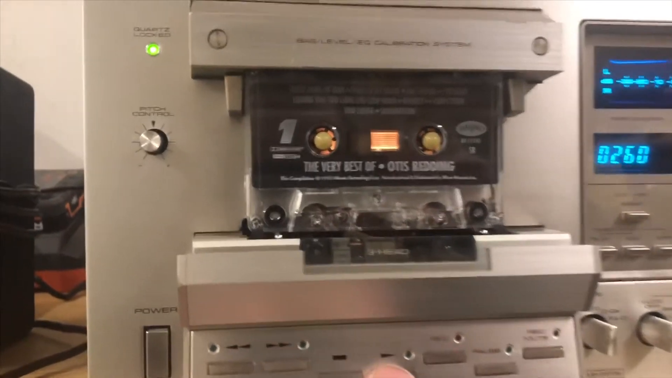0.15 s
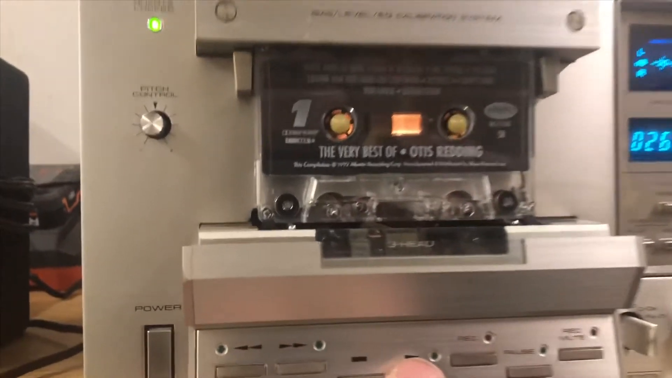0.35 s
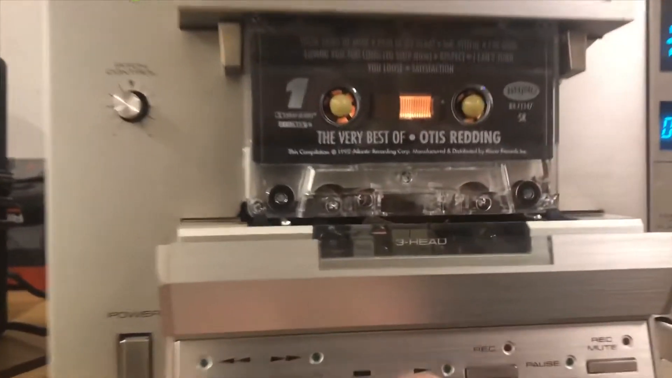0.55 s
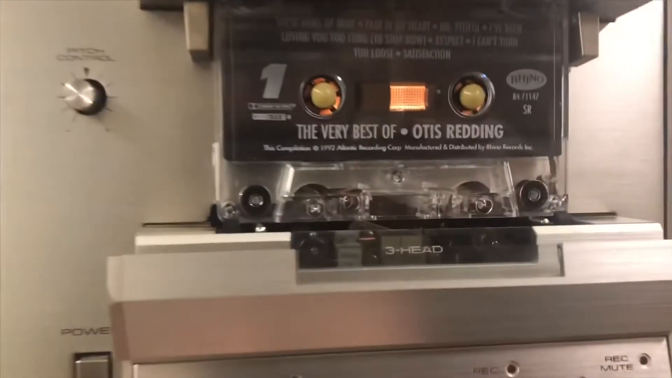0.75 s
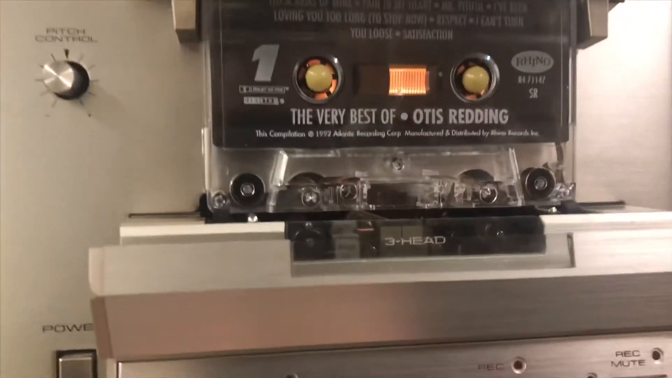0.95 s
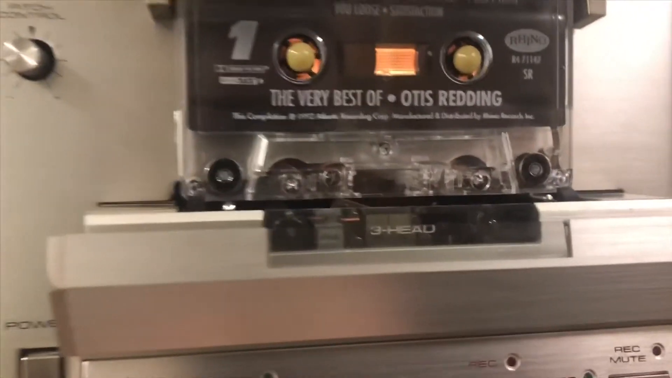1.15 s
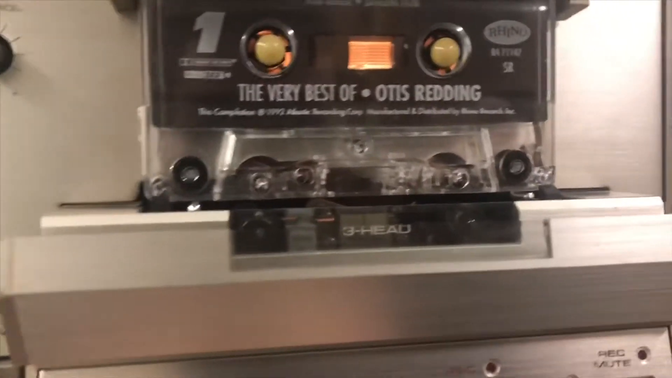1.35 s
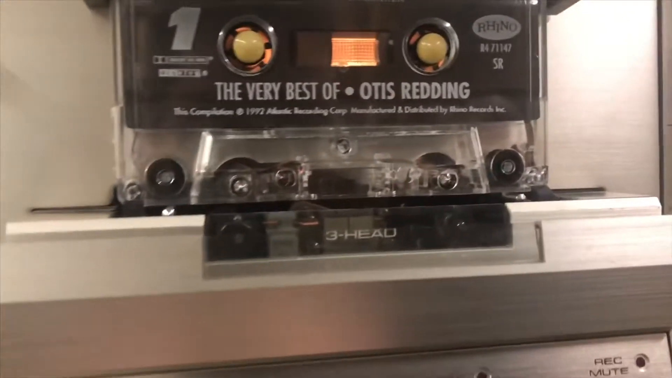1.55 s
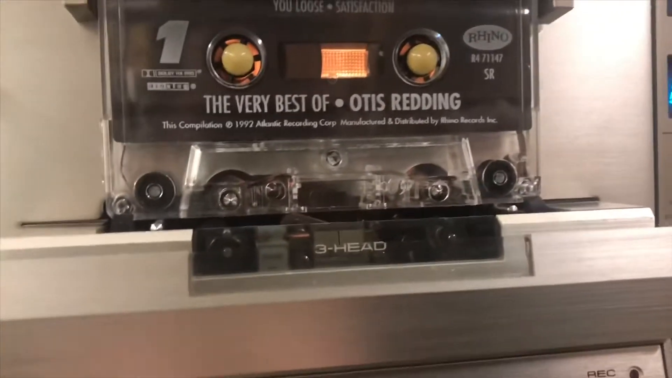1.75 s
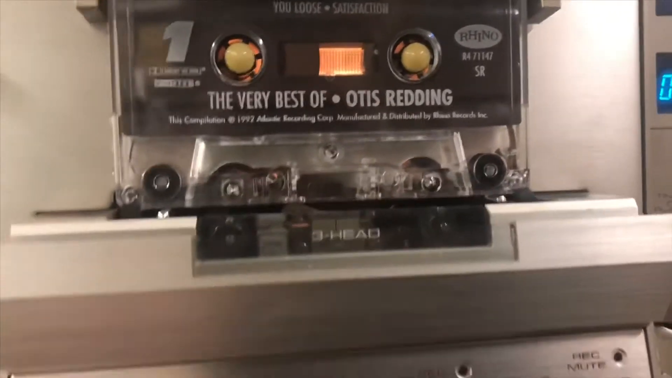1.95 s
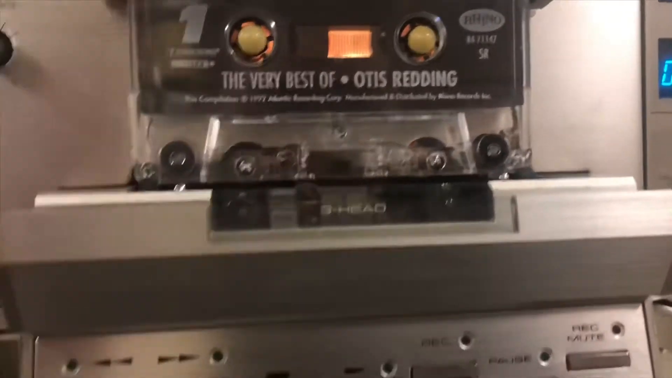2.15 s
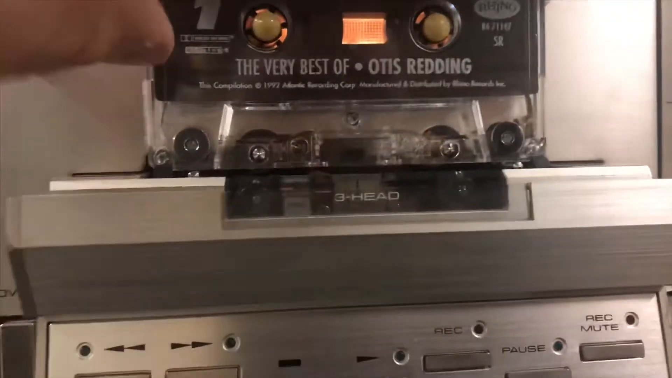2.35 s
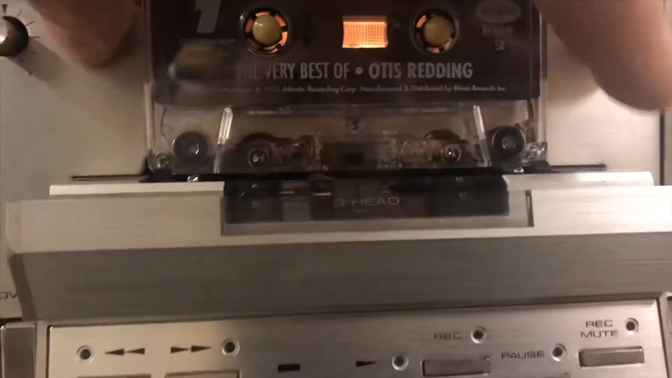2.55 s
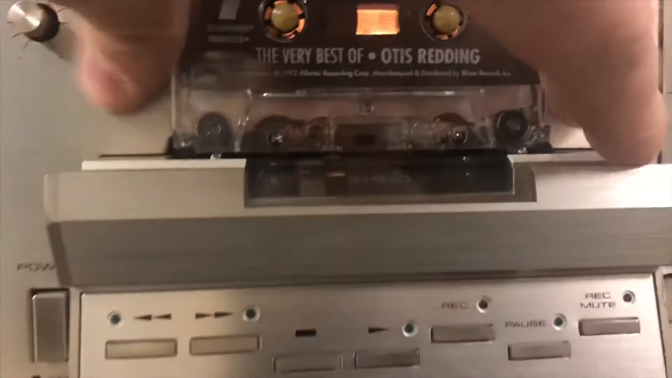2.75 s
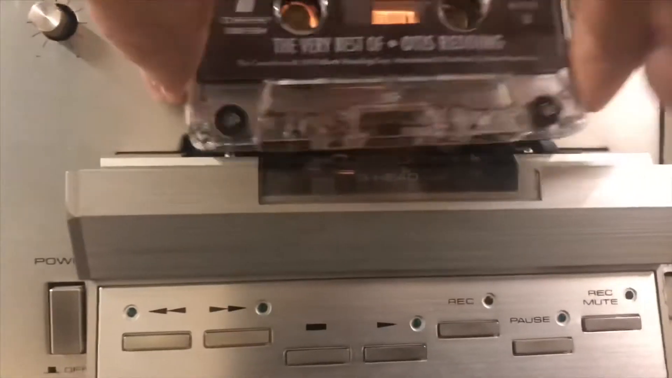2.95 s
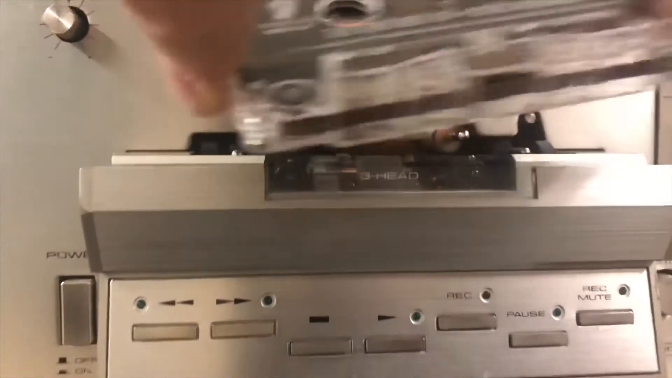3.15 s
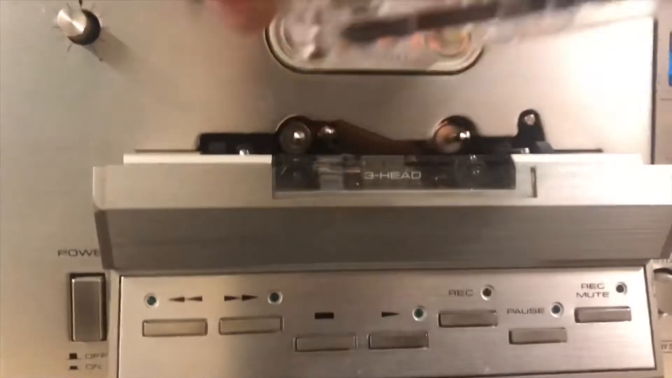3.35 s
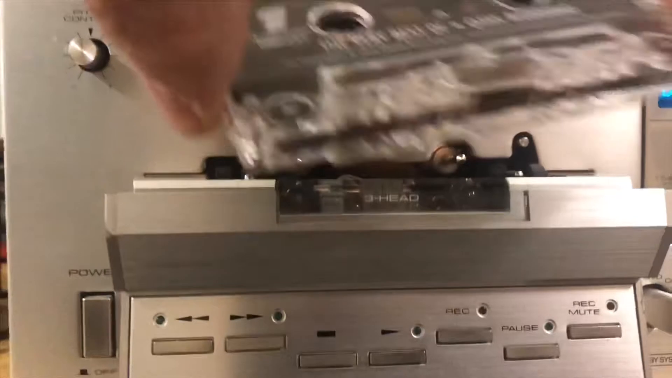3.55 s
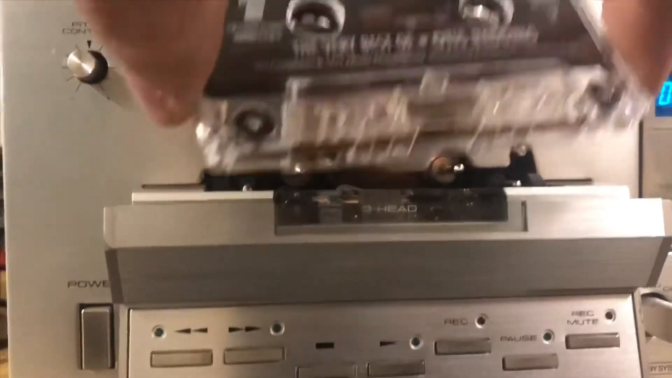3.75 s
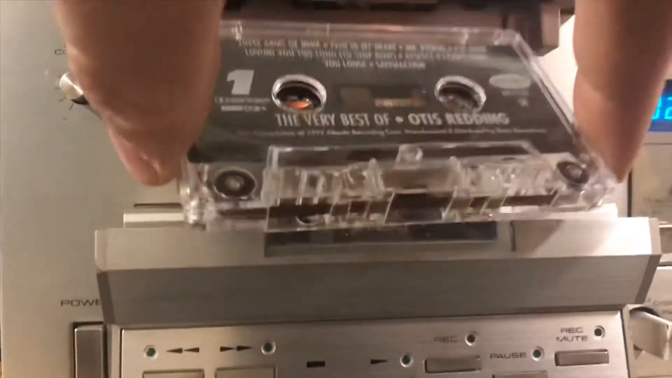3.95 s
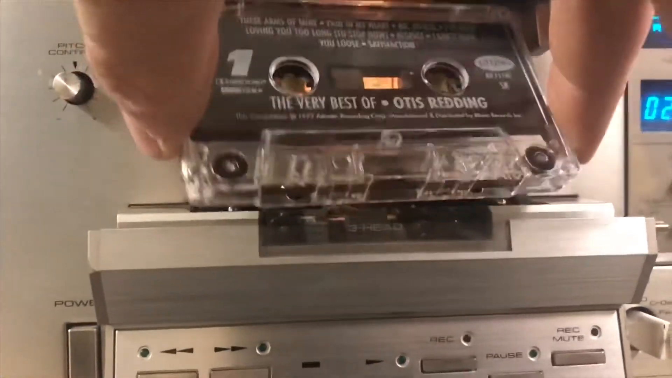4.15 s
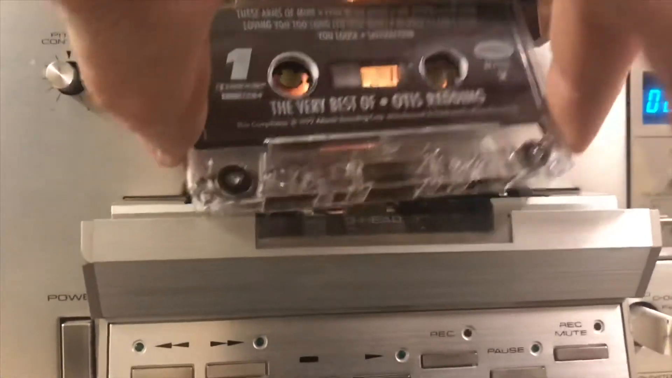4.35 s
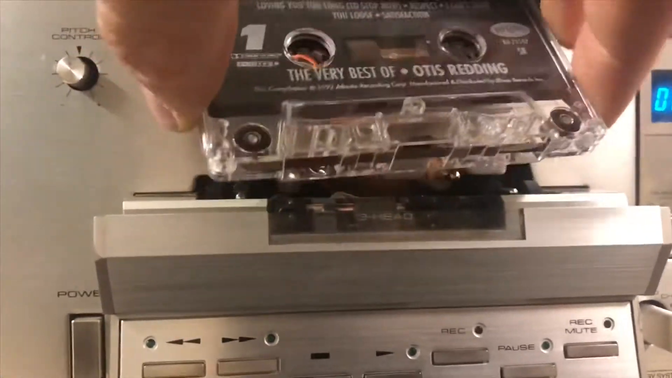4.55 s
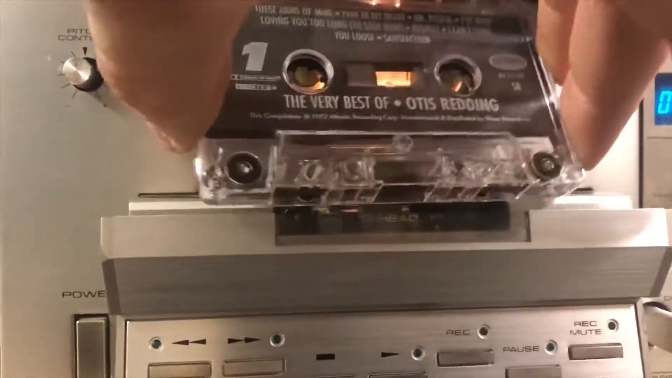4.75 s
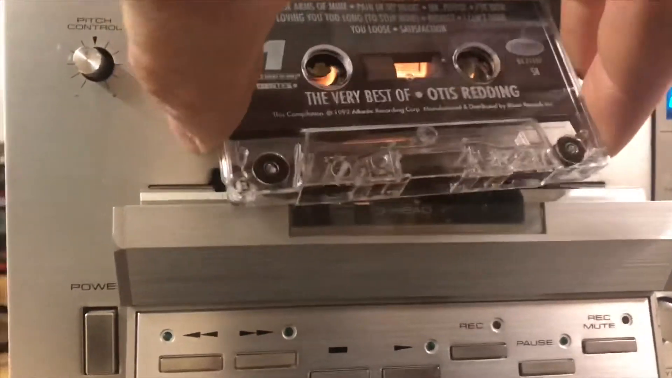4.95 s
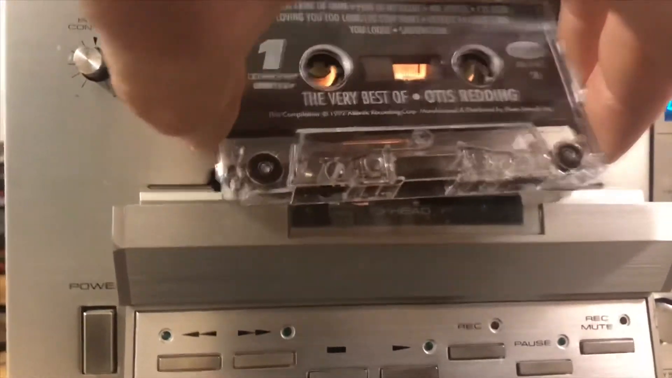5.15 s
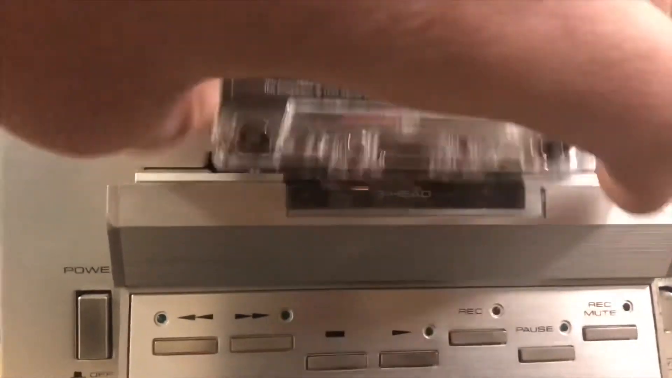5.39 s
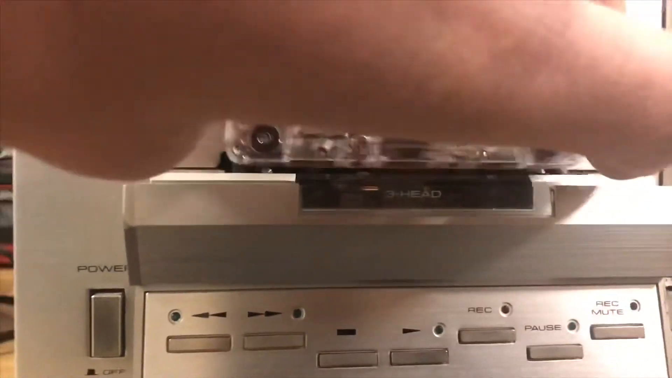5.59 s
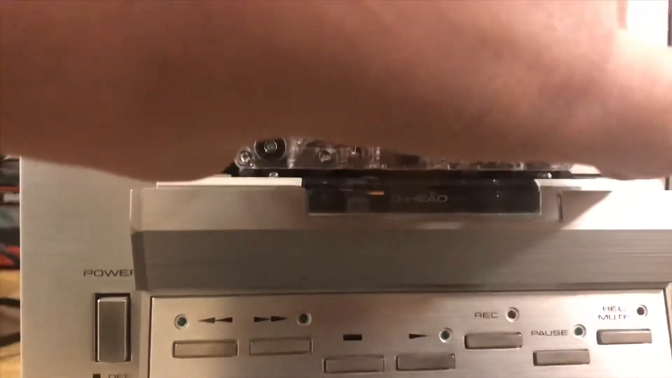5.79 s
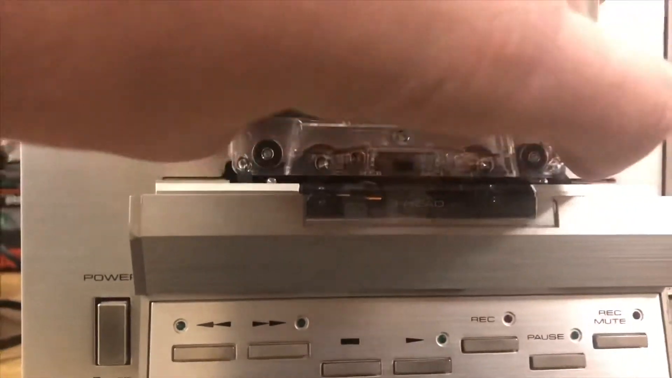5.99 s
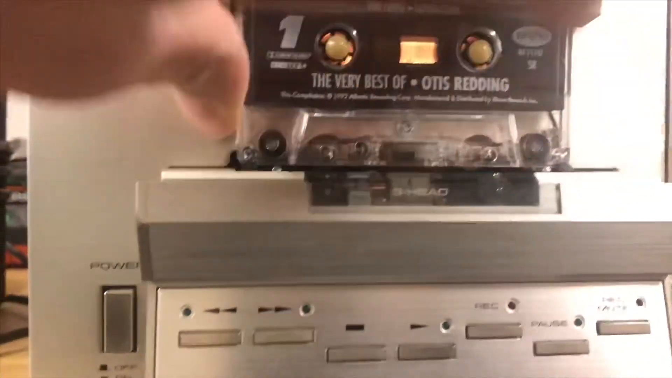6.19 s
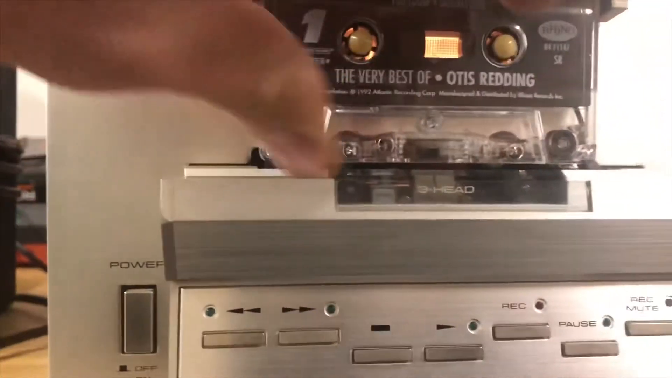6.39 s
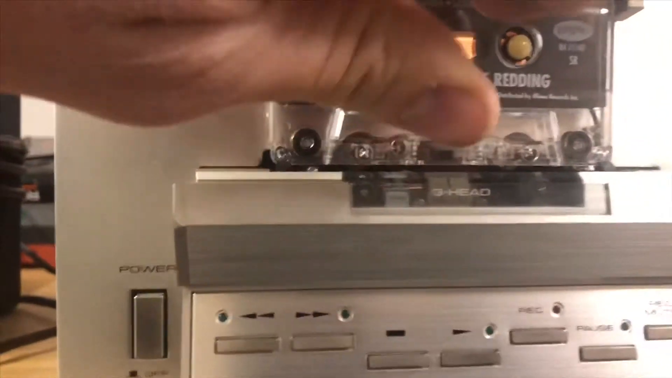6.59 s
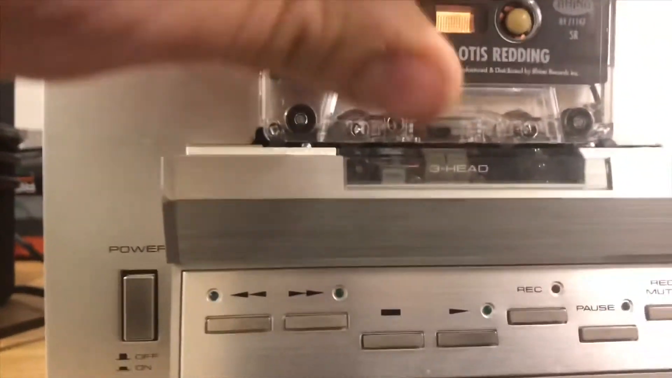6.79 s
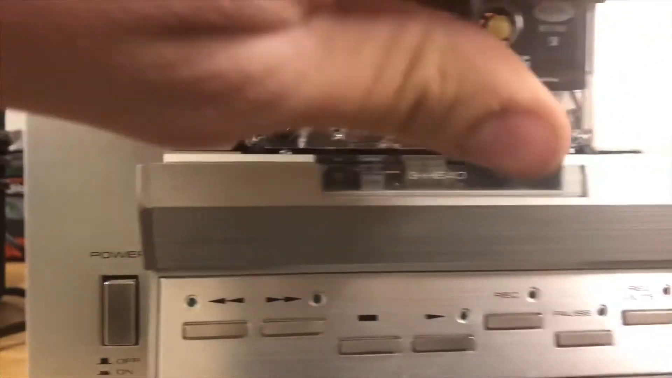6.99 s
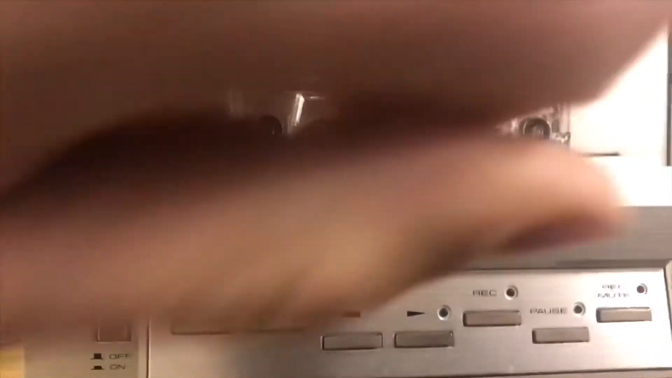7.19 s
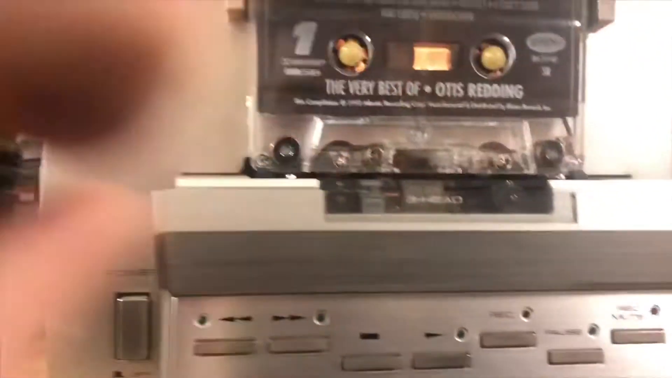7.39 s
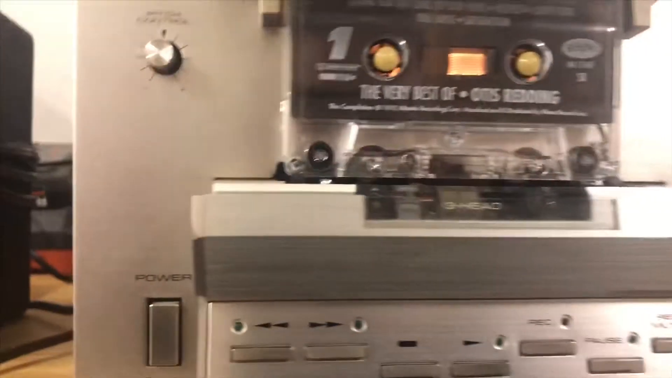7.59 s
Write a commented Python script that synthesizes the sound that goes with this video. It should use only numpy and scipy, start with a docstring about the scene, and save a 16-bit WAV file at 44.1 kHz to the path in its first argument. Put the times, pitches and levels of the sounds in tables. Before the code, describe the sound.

Close plastic clicks, scrapes and brief rattles as a hand removes a cassette from a deck and reseats it, over faint room hum.

```python
"""Cassette out of the deck and back in

One microphone, close to an open tape deck in a quiet, humming room. After a few small dry ticks by the
microphone, a hand pulls the plastic cassette out, fumbles it over the guide pins and snaps it back in.
Knocks, scrapes and brief rattles ring the shell, the pins and the spring clips; shoves set the front
panel ringing. A sleeve rustles, fingers slide on plastic."""
import sys
import numpy as np
from scipy import signal
from scipy.io import wavfile
from scipy.ndimage import uniform_filter1d

SR = 44100
rng = np.random.default_rng(int(sys.argv[2]) if len(sys.argv) > 2 else 0)


def wav_out(sig):
    """Save sig, one row per channel (or a flat mono array), as 16-bit PCM at SR to the path in sys.argv[1]."""
    wavfile.write(sys.argv[1], SR, np.round(np.clip(np.atleast_2d(sig).T, -1, 1) * 32767).astype(np.int16))


N = 336478

# Air handling behind the deck, spectrum: frequency_hz, density_db
AIR_SPECTRUM = [(12, -39), (20, -5), (127, -5.5), (198, -14.5), (228, -11.5), (328, -15), (367, -14.5),
                (558, -22), (607, -20.5), (759, -21.5), (1220, -24.5), (1860, -28), (2200, -30),
                (16000, -41.5)]
# Slow drift of that air noise: time_s, level_db
AIR_DRIFT = [(0.0, -1.5), (7.63, 1.5)]
# Mains hum in the room: pitch_hz, level_db
MAINS_HUM = [(118.4, -72.5), (242.2, -76.5), (360.7, -78.5), (597.5, -79.5), (1200, -87.5), (1319, -86.5)]
# Small dry ticks by the microphone, then the cassette knocking in the deck.
# Shell, clips, tick and thud levels are relative to the pins:
# start_s, pins_db, shell_db, clips_db, tick_db, thud_db, shell_pitch_hz, pin_pitch_hz, rise_s
KNOCKS = [(0.213, -46.5, -5, -7.0, 3, -25, 1990, 3990, 0.00012),
          (0.2198, -50.5, -11, -3, -3.0, -17, 1700, 2150, 0.00027),
          (1.3376, -33, -2.5, -22, -8.5, -11.5, 1550, 3800, 0.0017),
          (1.589, -45.5, 6.5, -14, -11, 4, 640, 2110, 0.0014),
          (1.631, -64, 8.0, -12.0, -10.0, 9, 1720, 2700, 0.0011),
          (1.6523, -55.5, 2, -12, -16.0, 5, 1700, 2110, 0.0007),
          (1.7042, -43.5, -2.5, -10.0, -19.0, -23, 1710, 4100, 0.00057),
          (1.777, -64, 12.0, -9.0, -3, 13.5, 990, 2470, 0.0035),
          (2.761, -36.5, -1.5, -11, -16, -7.5, 620, 2390, 0.00051),
          (2.768, -48.5, -4.0, 5, 5, 11.5, 640, 2580, 0.00029),
          (2.797, -26, -2, -10, -14, -13.5, 1650, 5400, 0.0038),
          (2.8119, -32, -6, 0, -14.0, -12, 1090, 5100, 0.0021),
          (2.819, -38.5, -8, 1, 3.0, -4, 750, 4960, 0.0018),
          (2.831, -38, -3, 8.5, -3, -2, 1650, 5390, 0.0027),
          (2.857, -43.5, 6, 2.0, -9, 1.5, 1650, 4960, 0.0051),
          (2.8726, -39.5, 1.5, -6, -6, -3.5, 1060, 2370, 0.00099),
          (2.8904, -34.5, 0.5, -6, -17, -8, 970, 2350, 0.00043),
          (2.9082, -51, 16, -7, -11.0, -2, 960, 4320, 0.00044),
          (2.9347, -38.5, 4, -2, -6.5, -3, 980, 3410, 0.0026),
          (3.0002, -45.0, 6, -2.5, -30, -3, 1260, 2560, 0.002),
          (3.023, -45.5, 8, 1, -3.0, 2.5, 1020, 3060, 0.0022),
          (3.0579, -43, 6.5, 3, -6.5, -12, 1220, 3380, 0.0028),
          (3.0672, -37.5, 2.5, -13, -23, -22.5, 1000, 2110, 0.00031),
          (3.084, -18.5, -2, 4.5, -4, -17.5, 1210, 2930, 0.00081),
          (3.1001, -36, 0.5, -3.0, 0, -15.5, 1030, 2810, 0.0065),
          (3.1099, -32.5, 2, -11.0, -12, -8.5, 1340, 2670, 0.0039),
          (3.41, -58.0, 0.0, -0.5, -13, -8, 1390, 5400, 0.0017),
          (3.537, -34, 0.5, -5, -12.5, 3.5, 1280, 3930, 0.0016),
          (3.5596, -31.5, -2.5, -3.0, -2, -13.0, 1210, 2300, 0.0015),
          (3.577, -40.5, 6, -3.0, -17.0, 4.5, 1220, 3270, 0.0007),
          (4.033, -43, -2.0, -7, 3, 2, 1115, 3960, 0.00032),
          (4.0388, -36, 5, 0.5, -8.0, -15, 1260, 2710, 0.00069),
          (4.0556, -29.5, 1.5, -8, -8.0, -7.5, 1270, 2110, 0.0035),
          (4.0753, -26.0, -2.5, -3.5, -9, -16.0, 1560, 2990, 0.00092),
          (4.094, -47, -8.0, 0.0, 4, -2, 1240, 2680, 0.0015),
          (4.103, -30, 0, -12.0, -12, -17, 1380, 2580, 0.001),
          (4.11, -40, 1, 4.5, 4, -12, 1370, 2520, 0.00086),
          (4.229, -26.5, -2, -6.5, -27, -12.0, 1990, 2100, 0.00084),
          (4.24, -42.5, -1, 2, -13, -2, 1060, 4050, 0.00059),
          (4.3652, -40.5, 8, -8, -23, -5, 1440, 2650, 0.0029),
          (4.4411, -69.5, 15.5, -2.0, -7.5, 12, 1000, 3380, 0.001),
          (4.56, -47.5, 4, -9, -12.5, -5.5, 940, 2790, 0.0011),
          (4.5751, -44.5, -2, -5.5, -4, 1.5, 1320, 2520, 0.0012),
          (4.612, -52.0, 10.0, -4.0, -16.0, -10.5, 1260, 2120, 0.003),
          (4.6177, -54.5, 14.5, -7, -27.0, -7, 1220, 2100, 0.0027),
          (4.6922, -57.0, 11.5, -8.0, -15, 5, 1205, 2520, 0.0045),
          (4.8264, -44.5, -7, -6.5, -12, -5.5, 1230, 2520, 0.00088),
          (4.9102, -39.5, 7, -10, -19, -12.5, 980, 2510, 0.0017),
          (4.9448, -61.5, 8.5, -4.5, -15, 1, 950, 3240, 0.0021),
          (4.9972, -50, 11.5, 3, -16, -5.5, 1240, 2730, 0.0024),
          (5.0522, -68.5, 17, 2, -6, 7.5, 990, 2110, 0.001),
          (5.1168, -34.5, -1.5, -0.5, -15, -7, 1010, 2870, 0.0033),
          (5.1322, -21.5, 1, 10.0, -2.5, -18, 1130, 2980, 0.0024),
          (5.147, -42.5, 12.0, 7.5, -3.0, 6.5, 1230, 2790, 0.0045),
          (5.1564, -25.0, -4, -8.0, -18, -21.5, 1990, 2570, 0.0022),
          (5.171, -53, 12, 14.5, 11, 2, 1260, 2510, 0.0014),
          (5.2377, -23.5, -14, -12, -23, -18, 1340, 3100, 0.0016),
          (5.3204, -32.0, 2.5, -8, -25, -11, 1200, 3130, 0.0026),
          (5.3401, -34.5, 0, -3.0, -12.0, -13, 1430, 2290, 0.0017),
          (5.3528, -25.5, 2.5, -11.5, -6.5, -23, 930, 3350, 0.002),
          (5.365, -40.5, 0, 13, -12.0, -8.0, 1370, 4090, 0.0015),
          (5.381, -32, -12.5, -8, -0.5, -15, 1830, 2630, 0.0029),
          (5.3909, -22, -5, -7.5, -20, -21.0, 1000, 2110, 0.0005),
          (5.4013, -35, 3.5, -4.0, -7.0, -10, 713, 2610, 0.0014),
          (5.4146, -30, -0.5, 2, -12, -7, 990, 2570, 0.001),
          (5.523, -30.5, 1.5, 10.5, 6, -16.5, 1420, 2400, 0.00067),
          (5.5406, -34.5, -6.5, -1, -15.0, -12.0, 1250, 4430, 0.0027),
          (5.5612, -34.5, 0.5, -2, -7, -6.5, 1310, 3900, 0.0019),
          (5.633, -45.5, 4, -7, -17, -0.5, 820, 2290, 0.0031),
          (5.6471, -45, 13, -17, -30.0, -23, 940, 2190, 0.00057),
          (5.6925, -54, 9.5, -4.5, -16.0, -4, 1070, 2390, 0.00035),
          (5.7069, -54.0, 8.5, -6, -10, 0.5, 1030, 2440, 0.0041),
          (5.722, -53.5, 3, -3, -12.0, -1.0, 1250, 3400, 0.0024),
          (5.836, -43, 0, 2, -4, -2, 1040, 2630, 0.00067),
          (5.8424, -22.5, -4.5, -1.5, -9, -53, 1450, 2650, 0.00017),
          (5.8449, -21.5, 3.0, 2.5, -7, -6.5, 1440, 2670, 0.0026),
          (5.8701, -19, -9.0, -7.5, -8, -22, 1010, 5390, 0.0015),
          (5.8871, -23, -3.5, 0.5, -14, -21, 1550, 2560, 0.0015),
          (5.8958, -18.5, -8.5, -3.5, -1, -27, 950, 4300, 0.0009),
          (5.972, -46.5, 1.5, -11, -6, 3, 990, 2630, 0.0051),
          (6.1048, -44, 5, -9, 6, -8.5, 1270, 3170, 0.0025),
          (6.1157, -26.0, -8, 1.5, -10.0, -24.0, 1000, 3150, 0.00042),
          (6.1214, -29, -6, 9, -3, -13, 1230, 3010, 0.0035),
          (6.1351, -36, 1, -1, -8.0, -7, 1020, 2520, 0.0063),
          (6.1594, -38.5, -6, 8.0, -12.0, 4.5, 1120, 4790, 0.002),
          (6.174, -39.5, -1, -4, -15, 3, 670, 5210, 0.0024),
          (6.2984, -57, 6, -2.0, -3, 10, 1320, 2110, 0.0054),
          (6.3481, -31.0, -4, -16, -24, -5, 2000, 3560, 0.0014),
          (6.3607, -47.5, 0, -4, -5.5, -8, 1030, 4890, 0.0041),
          (7.0031, -54.5, 8.0, -11, 6, 4.5, 880, 3565, 0.0032),
          (7.36, -66, 19, -5.0, -7.0, 19.5, 814, 2340, 0.00015)]
# Plastic scrapes, and brief rattles after some knocks; shell, clips and tick are relative to the pins:
# start_s, rise_s, hold_s, fall_s, pins_db, shell_db, clips_db, tick_db, pin_pitch_hz
SCRAPES_AND_RATTLES = [(.219, .002, 0.0046, 0.024, -64, -1, -9, -10, 3000),
                       (1.704, 0.0023, 0.0073, 0.023, -55.5, -5, -15, -18, 4000),
                       (1.775, 0.0056, 0.013, 0.14, -73, 6.5, -3, -9, 3000),
                       (2.747, 0.018, 0.0018, 0.037, -50.5, 0.5, -9.5, -16.5, 2700),
                       (2.787, 0.0075, 0.11, 0.054, -47.5, 0.5, -3.5, -14.5, 5000),
                       (3.019, 0.046, 0.015, 0.0057, -43.5, 4.5, -6, -9, 3400),
                       (3.1, 0.011, 0.0043, 0.016, -37.5, -2, -8.5, -14, 3000),
                       (3.13, .005, .03, 0.3, -68, 4.5, -6, -21.5, 3000),
                       (3.534, 0.0052, 0.033, 0.039, -43, 3.5, -1.5, -5, 3500),
                       (3.565, 0.016, 0.027, 0.022, -49.5, 7, 0, -7, 3500),
                       (3.67, 0.025, 0.055, 0.018, -45, -1, -5.5, -14, 3000),
                       (4.031, 0.025, 0.015, 0.017, -45, -1, -2, -6, 3300),
                       (4.086, 0.013, 0.029, .04, -59, 6.5, -4, -10, 3000),
                       (4.229, 0.0012, 0.0025, 0.012, -40.5, 2, -6, -18, 2300),
                       (4.52, 0.028, 0.036, 0.014, -54, 2, -6, -9, 3000),
                       (5.101, 0.024, 0.0056, .005, -47, 3.5, 0, -3.5, 3000),
                       (5.143, 0.0025, 0.017, 0.027, -40.5, 7, 1, -8, 2700),
                       (5.238, .002, 0.0057, 0.016, -47.5, 3, 1.5, -22, 3300),
                       (5.29, 0.056, 0.012, 0.011, -44.5, 6, 0, -8, 3300),
                       (5.368, 0.026, 0.024, 0.016, -39.5, -3.5, -5, -6, 3000),
                       (5.522, 0.001, 0.0054, 0.017, -34, -3.5, 4, -7, 4000),
                       (5.541, 0.0057, 0.017, 0.056, -48.5, 1, -3, -13, 3300),
                       (5.621, .03, 0.021, 0.083, -59.5, 4.5, -7, -14, 2400),
                       (5.827, 0.021, 0.0081, 0.031, -31, -2, -7.5, -14, 3000),
                       (5.865, 0.016, 0.024, .015, -40.5, 0.5, -14.5, -12, 4300),
                       (5.917, .01, 0.074, 0.27, -58.5, -1.5, -9.5, -11.5, 4800),
                       (6.103, 0.019, 0.0072, 0.027, -31, -1.5, -5, -8, 3500),
                       (6.144, 0.013, 0.041, 0.044, -48.5, -1, -4, -16, 4800),
                       (6.21, .02, .1, .03, -59.5, 1.5, -12, -18, 4000),
                       (6.98, 0.021, .012, 0.028, -63.5, 9, 0.5, 3, 3500)]
# Modes of guide pins, shell, spring clips, high tick, low thud and front panel: pitch_hz, level_db, t60_s
PIN_MODES = [(2300, 1, 0.0091), (2670, 0.5, .012), (2820, -11.5, 0.015), (3264, -2.5, 0.019),
             (3810, 5.5, 0.0059), (4300, -4, 0.019), (4893, -1.5, 0.013), (5360, -3.5, 0.016)]
SHELL_MODES = [(676, -7.5, .025), (730, -5.5, .025), (904, -10.5, .02), (1040, 0.5, .025),
               (1260, -3.5, 0.039), (1494, 1.5, 0.013), (1648, -4.5, 0.018), (1961, -2.5, 0.026)]
CLIP_MODES = [(5980, -5, 0.0066), (6290, -4.5, 0.0083), (7094, 0, 0.0057), (7680, -4, 0.0063),
              (8160, -5, .007), (8260, -7, 0.0051)]
TICK_MODES = [(9710, 6.5, 0.0026), (10740, 4.5, 0.0013), (12300, 4.5, 0.0017), (13200, -1.5, 0.0043),
              (15200, 3, .003)]
THUD_MODES = [(151, -1, 0.044), (235, -4, 0.14), (321, -1, 0.047), (432.4, -4, 0.044), (581, -1.5, 0.073)]
PANEL_MODES = [(212.4, -3, 0.62), (293, -4.5, 0.7), (421.5, -13, 0.58), (562, -11, 0.69), (737, -9, 0.54),
               (1030, -11.5, 0.413), (1270, -5, .25)]
PARTS = [PIN_MODES, SHELL_MODES, CLIP_MODES, TICK_MODES, THUD_MODES]
# Where the fade of a scrape or rattle ends, for each of PARTS: level_db
FADE_END_DB = [-26, -18.5, -30, -29.5, -12.5]
# Decay of the room's echo: frequency_hz, t60_s
WALL_DECAY = [(200, 1), (1000, 0.67), (4000, 0.34), (12000, 0.15)]
# Reaches of the arm: start_s, rise_s, hold_s, fall_s, level_db
ARM_REACHES = [(1.9, 0.23, .15, .3, -58.5), (2.2, 0.24, .05, .35, -57.5), (2.55, .15, 0.07, .06, -62),
               (6.75, .12, .03, .12, -74), (7.05, 0.23, 0.17, 0.23, -66.5)]
# Rubbing cloth, spectrum: frequency_hz, density_db
CLOTH_SPECTRUM = [(240, -39), (400, -3), (588, -2), (636, -7.5), (1060, 3), (1140, 0), (4510, -5),
                  (15000, -16), (16000, -24)]
# Shoves that shake the front panel: start_s, level_db
PANEL_SHOVES = [(3.538, -45), (4.058, -49), (5.136, -43), (5.354, -57), (5.524, -50), (5.86, -39.5),
                (6.125, -37.5), (6.351, -53.5)]
# Fingers shifting on the shell: start_s, rise_s, hold_s, fall_s, level_db
FINGER_SHIFTS = [(4.25, .04, .03, .05, -73), (4.35, .03, .005, 0.027, -66), (4.42, 0.042, 0.055, .12, -72),
                 (4.66, .06, 0.011, .07, -67), (4.82, 0.017, .005, 0.022, -64.5),
                 (4.97, .025, .005, 0.015, -63.5), (5.03, .03, .05, .03, -78)]
# Skin on plastic, spectrum: frequency_hz, density_db
SKIN_SPECTRUM = [(800, -7.5), (2000, -0.5), (4000, 0.5), (5500, -5.5), (7000, -3), (8100, -5.5),
                 (9500, -21.5), (15000, -17.5)]


def gain_of(db):
    """Decibels to gain."""
    return 10 ** (np.asarray(db) / 20)


def unit_rms(x):
    """Scales to rms 1."""
    return x / np.sqrt(np.mean(x ** 2) + 1e-20)


def value_at(points, hz):
    """Reads a table on a log-frequency axis."""
    table_hz, value = np.transpose(points)
    return np.interp(np.log(hz + 1), np.log(table_hz + 1), value)


def add(mix, start_s, sound):
    """Mixes a sound in at start_s."""
    part = mix[round(start_s * SR):][:len(sound)]
    part += sound[:len(part)]


def patchy_noise(spectrum, patchy_db, size):
    """Shaped noise with drifting louder and softer patches, rms 1."""
    hop = size // 4
    real, imag, patches = rng.standard_normal((N // hop + 5, size // 2 + 1, 3)).T
    patches = unit_rms(uniform_filter1d(uniform_filter1d(patches, size=12, axis=0), size=10, axis=1))
    shape_db = value_at(spectrum, np.fft.rfftfreq(size, 1 / SR))[:, None]
    spectra = (real + 1j * imag) * gain_of(shape_db + patchy_db * patches)
    return unit_rms(signal.istft(spectra, nperseg=size, noverlap=size - hop)[1][:N])


def ring(modes, spot, size, detune=.025, uneven_db=1.8, favoured_hz=None, focus_db=17.0):
    """One blow on a part; the spot struck and the grip shift the modes' strength and pitch."""
    hz, db, t60 = np.transpose(modes)[:, :, None]
    strength, shift = spot[:len(modes), None], spot[-len(modes):, None]
    if favoured_hz:  # modes lose focus_db per octave from this pitch
        db = db - focus_db * abs(np.log2(hz / favoured_hz))
    t = np.arange(size) / SR
    decay = np.sign(strength * shift) * gain_of(db + uneven_db * strength - 60 * t / t60)
    return (decay * np.sin(2 * np.pi * hz * (1 + detune * shift) * t)).sum(0)


def stroke(t, start, rise, hold, fall, start_db=-14, end_db=-14):
    """Gain that rises, holds and falls on straight lines in dB, silent outside."""
    corners = start + np.cumsum(np.maximum([0, rise, hold, fall], 0))
    return gain_of(np.interp(t, corners, [start_db, 0, 0, end_db], left=-120, right=-120))


def brushing(rows):
    """Level of a soft rub over time, one stroke a row."""
    t = np.arange(N) / SR
    return uniform_filter1d(sum(gain_of(db) * stroke(t, *shape) for *shape, db in rows), size=300)


def room_tone(air_db=-61.5):
    """Air-handling rumble and hiss in the background, with wavering mains hum."""
    t = np.arange(N) / SR
    wavers = unit_rms(uniform_filter1d(rng.standard_normal((len(MAINS_HUM), N)), size=8000, axis=1))
    hum = sum(np.sqrt(2) * gain_of(db + 0.9 * waver) * np.sin(2 * np.pi * (hz * t + rng.random()))
              for (hz, db), waver in zip(MAINS_HUM, wavers))
    drift_db = np.interp(t, *np.transpose(AIR_DRIFT))
    return hum + gain_of(air_db + drift_db) * patchy_noise(AIR_SPECTRUM, patchy_db=.3, size=2048)


def knocks(chatter_t60_s=.014, settle_db=-21, settle_t60_s=.055):
    """Each tick or knock is a quick chatter of contacts that builds, dies and rings at three spots."""
    out, t = np.zeros(N), np.arange(2500) / SR
    all_spots = rng.standard_normal((len(KNOCKS), len(PARTS), 3, 16))
    rattles = rng.standard_normal((len(KNOCKS), 3, len(t)))
    for (start, db, *shares_db, shell_hz, pin_hz, rise), part_spots, rattle in zip(KNOCKS, all_spots, rattles):
        rise = max(rise, 1 / SR)
        after = np.maximum(t - rise, 0)
        chatter = gain_of(-60 * after / (chatter_t60_s + 2.5 * rise))  # slower knocks rattle longer
        settling = gain_of(settle_db - 60 * after / settle_t60_s)
        drive = rattle * np.minimum(t / rise, 1) * (chatter + settling)
        drive[:, round(.7 * rise * SR)] = 6.5  # the main contact stands out of the chatter
        pitches = [pin_hz, shell_hz, None, None, None]
        for modes, share_db, hz, spots in zip(PARTS, [0, *shares_db], pitches, part_spots):
            body = np.array([ring(modes, spot, size=2500, favoured_hz=hz) for spot in spots])
            sound = signal.fftconvolve(drive, body, axes=1).sum(0)
            peak = np.sqrt(2 * uniform_filter1d(sound ** 2, size=80).max())
            add(out, start, gain_of(db + share_db) * sound / peak)
    return out


def scrapes_and_rattles(spot_count=6, contacts_per_s=3000, spread_db=2.5, shell_hz=1150):
    """Dense uneven contacts at several spots: plastic scraping on metal, or a rattle after a knock."""
    out, t = np.zeros(N), np.arange(round(.4 * SR)) / SR
    for start, rise, hold, fall, db, shell_db, clips_db, tick_db, pin_hz in SCRAPES_AND_RATTLES:
        force = gain_of(spread_db * np.minimum(rng.exponential(1, len(t)), 4))
        force *= rng.choice([-1, 1], len(t))
        contacts = unit_rms(force * (rng.random(len(t)) < contacts_per_s / SR))
        at_spot = rng.integers(0, spot_count, len(t)) == np.arange(spot_count)[:, None]
        thud_db = shell_db - 13
        shares_db = [0, shell_db, clips_db, tick_db, thud_db]
        pitches = [pin_hz, shell_hz, None, None, None]
        for modes, share_db, hz, end_db in zip(PARTS, shares_db, pitches, FADE_END_DB):
            body = np.array([ring(modes, spot, size=1500, favoured_hz=hz, focus_db=6.0)
                             for spot in rng.standard_normal((spot_count, 16))])
            body /= np.linalg.norm(body, axis=1, keepdims=True)
            drive = at_spot * contacts * stroke(t, 0, rise, hold, fall, start_db=-28, end_db=end_db)
            add(out, start, gain_of(db + share_db) * signal.fftconvolve(drive, body, axes=1).sum(0))
    return out


def wall_echo(sound):
    """Sparse reflections of random sign off the walls, the treble dying first."""
    taps = np.zeros(SR // 2)
    slots = np.arange(200, len(taps) - 20, 20)
    taps[slots + rng.integers(0, 20, len(slots))] = rng.choice([-1., 1.], len(slots))
    hz, t, spectra = signal.stft(taps, SR, nperseg=256)
    decay = gain_of(-60 * t / value_at(WALL_DECAY, hz)[:, None])
    tail = signal.istft(spectra * decay, SR, nperseg=256)[1]
    return signal.fftconvolve(sound, tail / np.linalg.norm(tail))[:N]


def sleeve():
    """Cloth brushes on cloth while the arm reaches and withdraws."""
    return brushing(ARM_REACHES) * patchy_noise(CLOTH_SPECTRUM, patchy_db=1.0, size=512)


def front_panel(swell_s=.005):
    """The deck's heavy front panel hums on after a shove."""
    out, spots = np.zeros(N), rng.standard_normal((len(PANEL_SHOVES), 16))
    swell = np.minimum(np.arange(SR // 2) / (swell_s * SR), 1)
    for (start, db), spot in zip(PANEL_SHOVES, spots):
        ringing = ring(PANEL_MODES, spot, size=SR // 2, detune=0.00099, uneven_db=2.0)
        add(out, start, gain_of(db) * swell * ringing)
    return out


def fingers():
    """Skin slides faintly over the plastic between taps."""
    return brushing(FINGER_SHIFTS) * patchy_noise(SKIN_SPECTRUM, patchy_db=3.5, size=512)


def scene(echo_db=-21, closest_until_s=2.0, closest_echo_db=-8):
    """Handling close up, with the room's echo and tone behind it."""
    bass_cut = signal.butter(3, 170.0, "high", fs=SR, output="sos")  # the close handling sounds are cut below 170 Hz
    near = signal.sosfilt(bass_cut, knocks() + scrapes_and_rattles())
    # the early ticks come from right by the microphone and wake the room less
    to_walls = near * gain_of(echo_db + closest_echo_db * (np.arange(N) < closest_until_s * SR))
    return (near + wall_echo(to_walls) + front_panel() + sleeve() + fingers() + room_tone())[None]


def record(dry, low_cut_hz=36.0, band_limit_hz=16000):
    """One close microphone: its bass roll-off, then the band limit."""
    thinned = signal.sosfilt(signal.butter(2, low_cut_hz, "high", fs=SR, output="sos"), dry)
    lowpass = signal.firwin(511, band_limit_hz, window=("kaiser", 9), fs=SR)
    return signal.oaconvolve(thinned, lowpass[None], "same")


dry = scene()
out = record(dry)
wav_out(out)
```